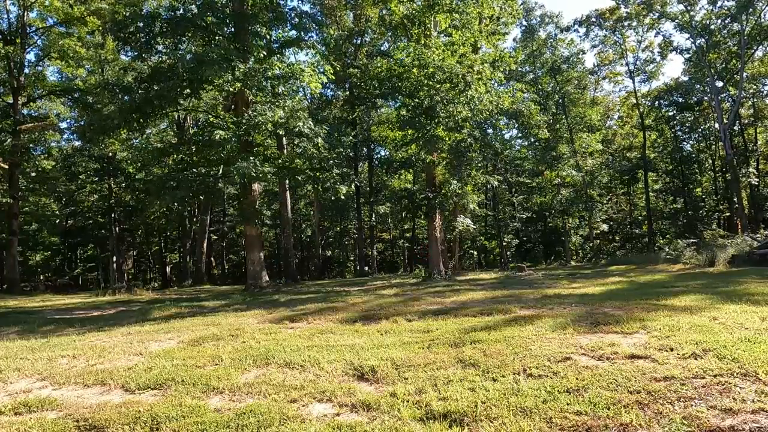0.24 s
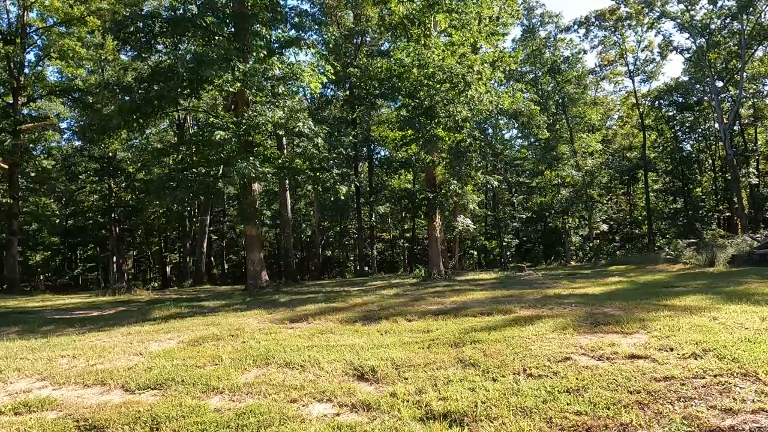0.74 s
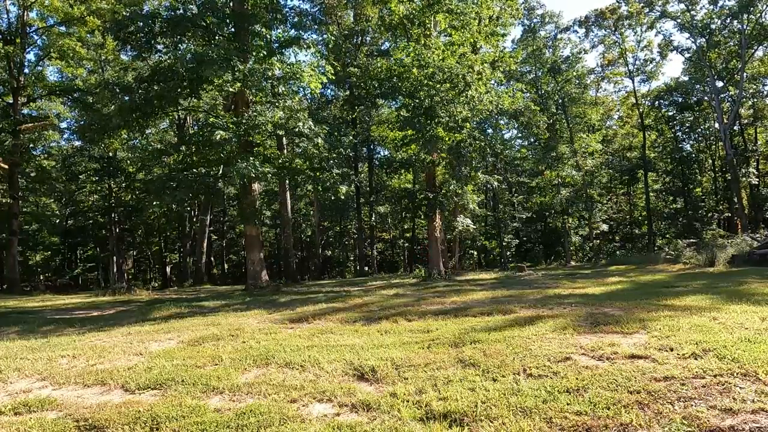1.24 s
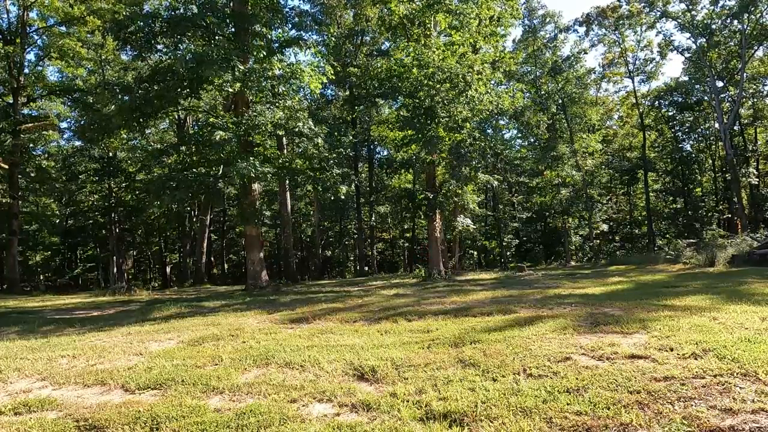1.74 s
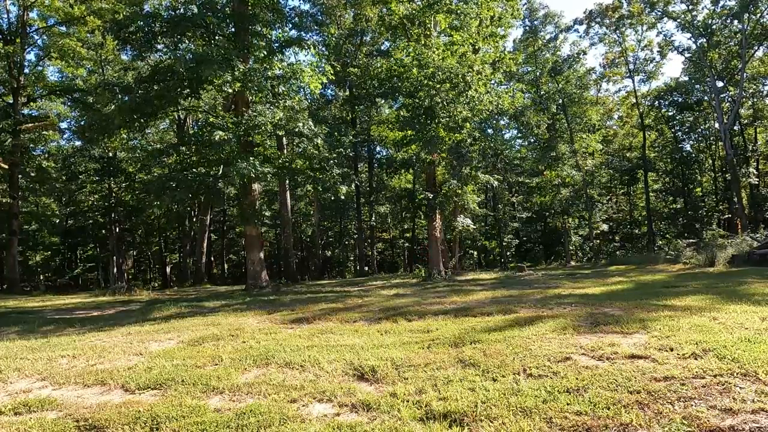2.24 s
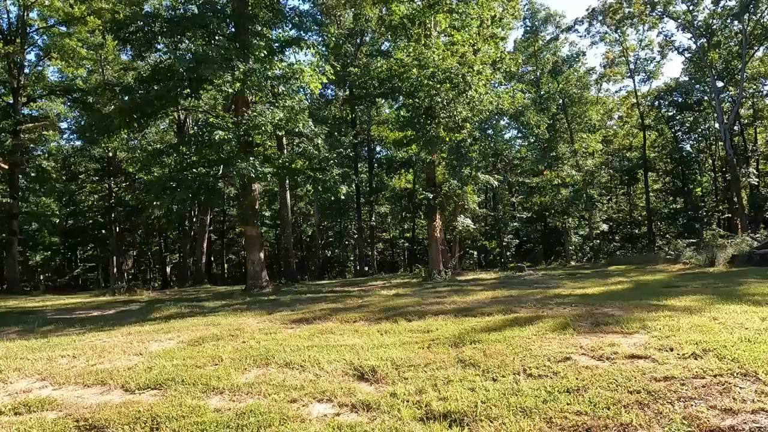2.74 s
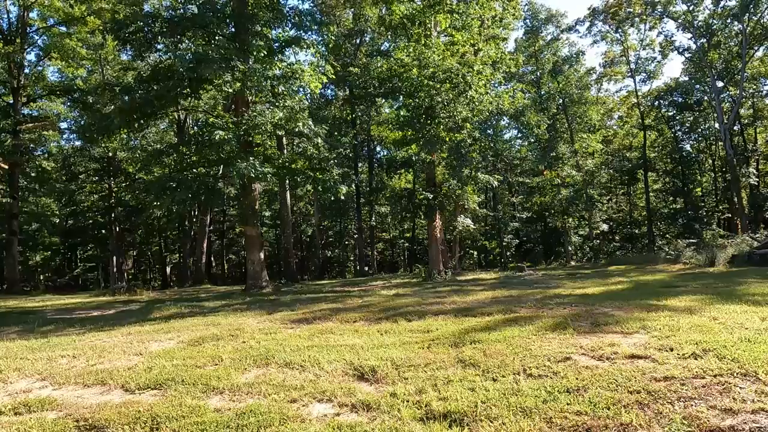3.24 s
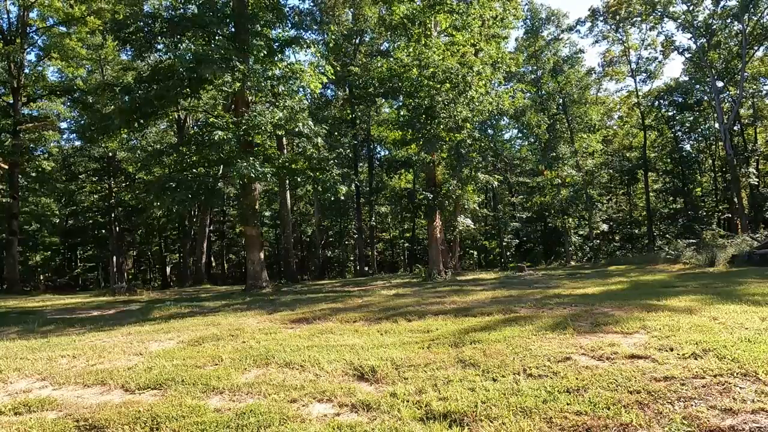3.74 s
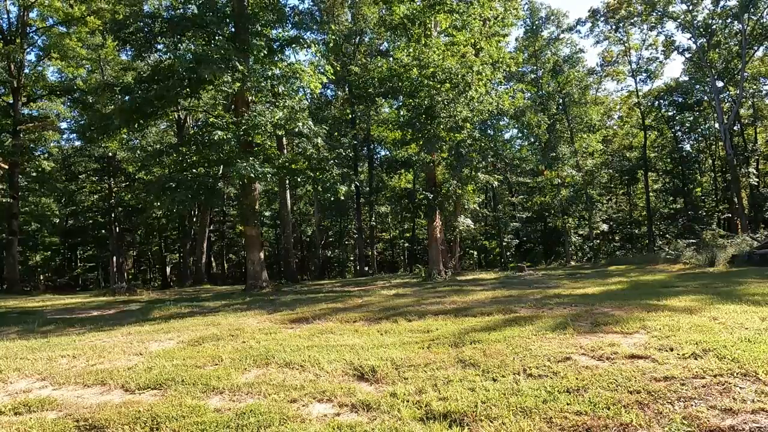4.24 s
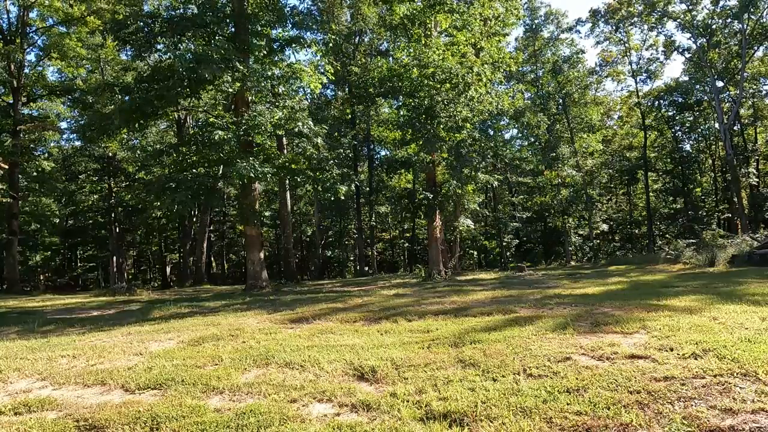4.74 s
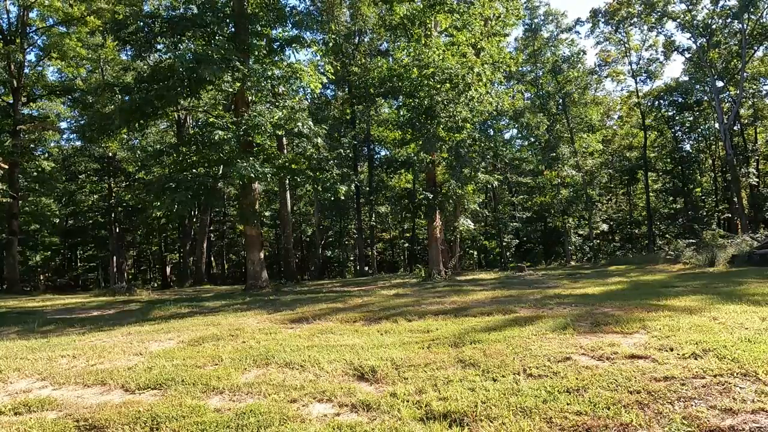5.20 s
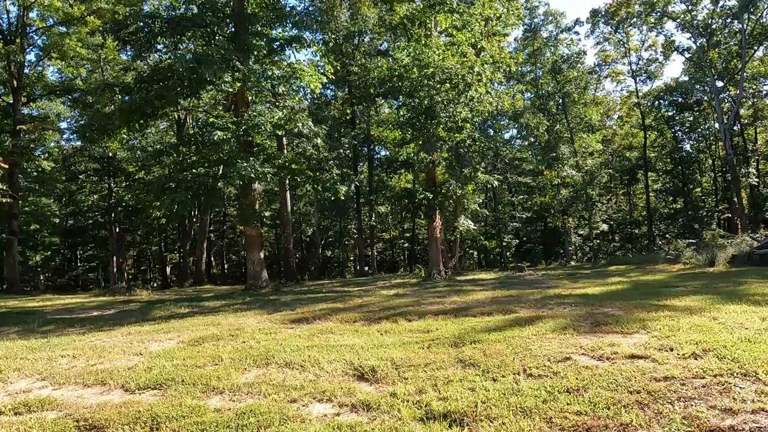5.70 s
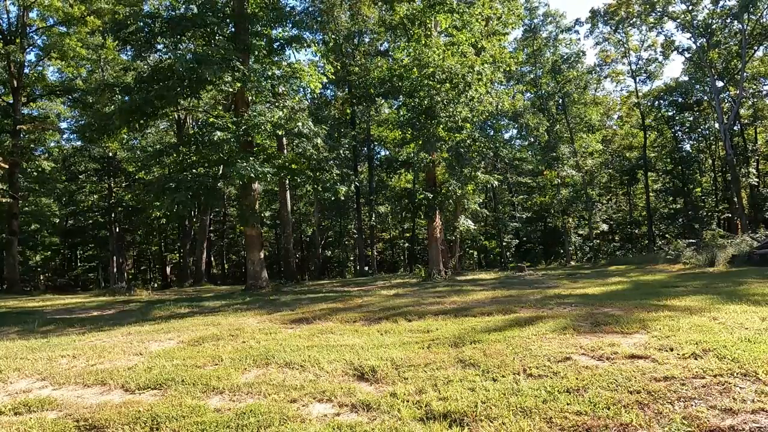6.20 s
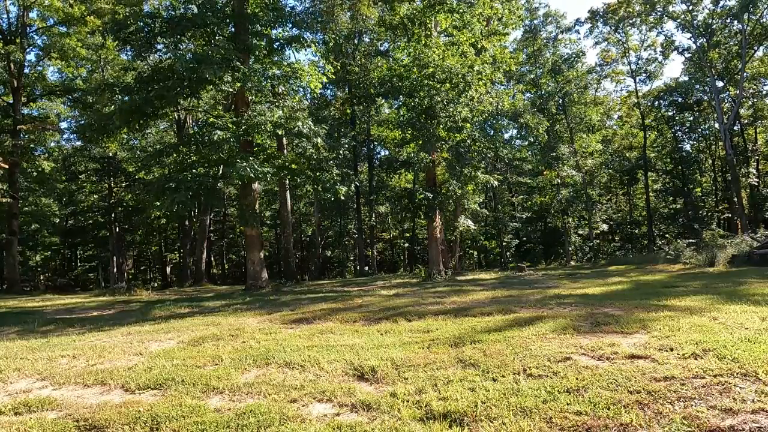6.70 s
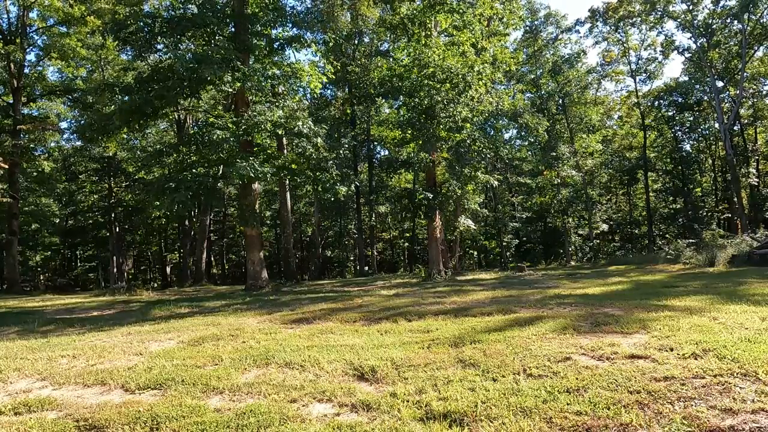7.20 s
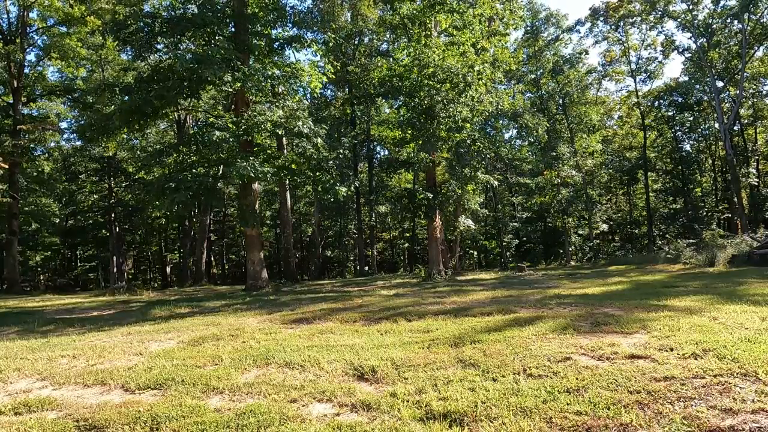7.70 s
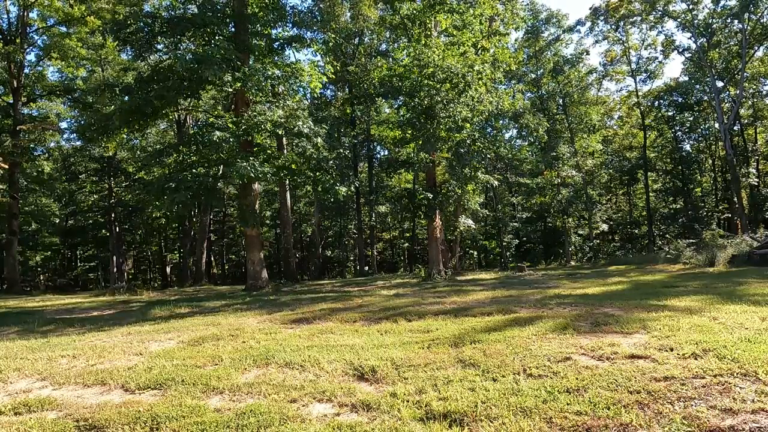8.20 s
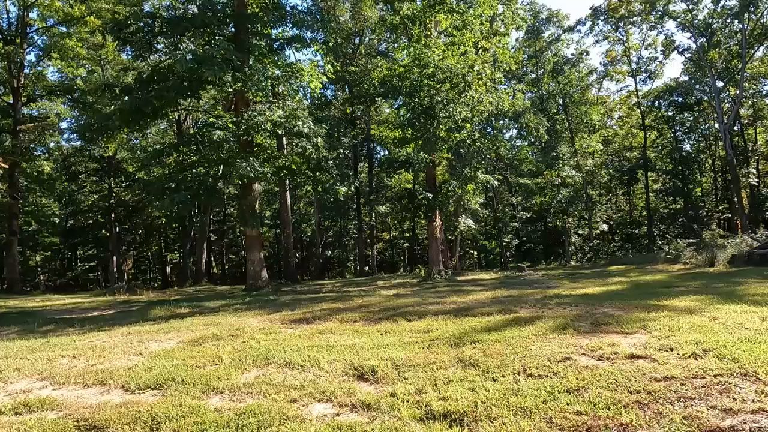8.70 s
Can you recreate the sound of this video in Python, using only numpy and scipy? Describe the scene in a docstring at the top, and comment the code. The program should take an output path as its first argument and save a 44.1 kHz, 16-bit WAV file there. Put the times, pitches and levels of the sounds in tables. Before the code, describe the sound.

Quiet grassy clearing by trees: brief wind gusts rumble at the microphone over soft leaves, thin insect pulses and cricket chirps. Then steady hammering on a wedge begins, loud and slightly right of centre. The first blow is looser; later ones thump more solidly and the knock mostly tightens in pitch before dropping on the ninth. Each blow bounces off nearby trunks and a wall, then fades into the woods.

```python
"""At the edge of a wood, across a lawn: gusts rumble at the microphone over a hush of leaves, all shaped noise.
From the start two high insects pulse, a far throbbing trill swells twice, and a cricket whistles until about 3.6 s.
At 2.3 s a sledge begins driving a wedge into a large tree: nine blows, the last at 8.4 s.
Each blow cracks (damped modes), thumps the trunk, rings the steel and rolls off among the trees (scattered
noise), then returns off nearby trunks and a wall behind the microphone. Two tiny noise ticks lie in the grass."""
import sys
import numpy as np
from scipy import signal
from scipy.fft import rfft, irfft, next_fast_len
from scipy.io import wavfile

SR = 44100
rng = np.random.default_rng(int(sys.argv[2]) if len(sys.argv) > 2 else 0)


def output_pcm(signal):
    """Save a mono or channel-first signal as 16-bit PCM at the path in sys.argv[1].

    Samples are clipped to [-1, 1] before scaling.
    """
    pcm = np.clip(np.atleast_2d(signal).T, -1, 1) * 32767
    wavfile.write(sys.argv[1], SR, np.round(pcm).astype(np.int16))


N = 394694  # samples, nearly 9 s

# Levels in the tables are relative: further gains and filters act on them.
# breeze at the microphone: time_s, level_db
BREEZE = [(0.0, -30), (1.2, -47), (1.32, -37.5), (1.68, -27.5), (2.04, -43), (2.16, -36.5), (3.48, -35.5),
          (3.6, -48), (3.96, -43.5), (4.08, -41), (6.24, -40), (6.36, -48), (7.32, -41), (8.16, -52),
          (8.52, -41), (8.64, -50), (8.94, -49)]
# sudden gusts: peak_s, length_s, rumble_db, buffeting_db
GUSTS = [(.115, .1, -28, -37), (3.96, .1, -31, -44), (7.335, .16, -33, -51)]
# colour of the wind at the microphone: frequency_hz, level_db per Hz
WIND_COLOUR = [(9, 0), (15, 1), (29, 1.5), (45, -2.5), (61, -6.5), (93, -10.5), (124, -12), (210, -25),
               (269, -27.5), (350, -29.5), (600, -49), (780, -77), (1320, -120)]
# left-right likeness of the wind: frequency_hz, likeness (0 to 1)
WIND_LIKENESS = [(25, 0.66), (70, 1), (200, 0.93)]
RUMBLE_DB, FLUTTER_DB, FLUTTER_S = 0.5, 2.5, 0.12  # rumble over the breeze; its random unsteadiness
BUFFET_DB, BUFFET_FOLLOWS = -31.5, 0.49  # buffeting grows more slowly than rumble: dB, dB per dB of breeze

# colour of the leaves: frequency_hz, level_db per Hz
LEAVES_COLOUR = [(150, 0.5), (250, -9.5), (350, -11.5), (620, -11.5), (674, -11), (784, -13.5),
                 (1510, -7.5), (1820, -9.5), (2260, -9.5), (4070, -16), (4510, -15), (5070, -14),
                 (7590, -23.5), (8250, -32), (13900, -45)]
# left-right likeness of the leaves: frequency_hz, likeness (0 to 1)
LEAVES_LIKENESS = [(60, 0.91), (130, 1), (280, 0.79), (610, 0.76), (1320, 0.8), (2870, 0.59), (6210, 0.49),
                   (13400, 0.99)]
LEAVES_DB = -53.5

# swells of the far insect trill: peak_s, length_s, level_db
TRILLS = [(.01, 0.36, -61.5), (2.25, 1, -66)]
TRILL_HZ, TRILL_WIDTH_HZ, TRILL_PER_S = 3240, 90, 24
# cricket chirps: start_s, level_db
CRICKET_CHIRPS = [(.14, -61), (.74, -60), (1.429, -59), (2.15, -67), (2.86, -60), (3.559, -61)]
# pulses within a chirp: delay_s, pitch_hz (at the top of its arch), level_db
CRICKET_PULSES = [(0, 4470, 2), (.055, 4570, 3.5), (.11, 4660, 3.5), (.172, 4630, 4.5)]
# steady insects: pitch_hz, chirps_per_s, level_db
INSECTS = [(7850, 6.3, -75), (7550, 6.6, -76)]
# tiny ticks in the grass: start_s, level_db
TICKS = [(.46, -52), (8.799, -56)]

# reflections off nearby trunks and the wall: delay_s, level_db
ECHOES = [(0.0587, -5.5), (0.1113, 2), (0.1184, -16), (0.1265, -12.5)]
# colour of those reflections: frequency_hz, level_db
ECHO_COLOUR = [(60, -19.5), (100, -3), (150, -15.5), (220, -8.5), (600, -11.5), (1200, -4.5), (4000, -9.5),
               (7000, -9), (10000, -18.5), (15000, -26)]
# ring of the closest trunks: frequency_hz, t60_s
CLOSE_TRUNKS = [(500, 0.33), (2000, 0.26), (5000, 0.21), (10000, 0.17)]
# ring of the deep wood: frequency_hz, t60_s
FOREST = [(100, 2.24), (500, 0.64), (1100, 2.63), (2000, 1.58), (3500, 1.38), (6000, 0.63), (12000, 0.72)]
NEAR_DB, FARTHER_DB, FOREST_DB = -2.5, -6, -7.5  # closest trunks, those behind them, the deep wood

# waves in the struck trunk, with a late boom: delay_s, pitch_hz, level_db, t60_s
TRUNK = [(0.0018, 227, -13, 0.017), (0.023, 1000, -24, 0.055), (0.00794, 690, -28, 0.057),
         (0.031, 523, -34.5, 0.061), (.031, 371, -27.5, 0.061), (0.01225, 262, -32, 0.168),
         (0.0262, 92.3, -23, 0.15), (.13, 140, -27.5, 0.22)]
# colour of the trunk's dense knock: frequency_hz, level_db
KNOCK = [(40, -31), (100, 13), (200, 17.5), (330, 13), (450, 11), (700, 11), (1000, 0), (1600, 6),
         (4000, -32)]
THUD_DB, SLACK_DB, SEATING_BLOWS = 0.14, -11, 1.52  # a loose wedge barely moves the trunk, then it seats

# free ring of the steel: pitch_hz, level_db, t60_s
STEEL = [(5080, -39.5, 0.47), (5140, -40, 0.64), (4700, -48, 0.36), (7400, -52, 0.19)]
STEEL_ECHO_DB = -1  # a little less of the ring is reflected

# modes of the struck wedge and the wood gripping it: pitch_hz (before detuning), width_hz, level_db
CRACK = [(1000, 440, 9), (1304, 116, 18), (1459, 59, 23.5), (1838, 170, 18), (2125, 87, 15),
         (2396, 730, 18.5), (2700, 180, 18.5), (3180, 230, 19.5), (3580, 120, 17.5), (4054, 280, 18.5),
         (4170, 350, 14.5), (5330, 1260, 17), (6530, 810, 13.5), (8580, 180, -2.5), (10190, 380, 4.5),
         (12600, 1300, -3)]
CRACK_DB, CRACK_FOLLOWS = -1.94, 0.73  # level, and dB per dB of a blow's strength
CRACK_BRIGHTENS = 1.33  # dB per dB of a blow's edge
CRACK_BODY_DB, CRACK_BODY_HZ, CRACK_BODY_OCTAVES = -2.5, 1180, 1  # thin in the low middle

# colour of what the wedge sends sideways among the trees: frequency_hz, level_db
CLACK = [(100, -42), (450, -1.5), (750, 1), (1000, 7), (1400, 5), (2000, 6), (4000, 3.5), (6000, -3),
         (7200, -9), (8600, -16), (10500, -23), (14000, -44)]
CUT_HZ, CUT_OCTAVES = 1087, 0.33  # the saw cut keeps its pitch
WEDGE_OCTAVES = 0.25  # width of the wedge's own clang
EDGE_BAND_HZ, EDGE_OCTAVES = 8600, 0.5  # a square blow has a sharp edge here

# one row a blow; the gripping wood mostly climbs in pitch as it tightens, and drops when it gives: start_s,
# strength_db, cut_db, grip_hz, grip_width_octaves, grip_db, clang_hz, clang_db, edge_db, steel_ring_db,
# second_crack_db, echo_db
BLOWS = [(2.2885, -1.5, 7, 1410, 0.23, 5, 2440, 9, -5, -19, -10.5, -4),
         (3.0566, 1, -5, 1363, .2, 12.5, 3070, 6.5, 0, -20, -10, -2),
         (3.831, 0.25, -1, 1530, 0.15, 7.5, 3100, 6, 2.5, -3.5, -16, -.5),
         (4.601, 1.5, 2.5, 1680, 0.19, 8, 3170, 6.5, 2.5, -3, -8.5, -2.5),
         (5.3614, 0, 9, 2100, .3, 15.5, 3140, 10, -0.5, -9, -14.5, -3),
         (6.0943, 1, 9, 2100, 0.23, 12.5, 2900, 7.5, 2.5, -8, -8, -3),
         (6.849, 0.5, 10.5, 1880, 0.2, 7.5, 3100, 4.5, 0, 2, -14, -3),
         (7.6113, -1, 13, 1950, 0.17, 5.5, 3200, 7, 5.5, -11, -28, -1.5),
         (8.396, 2, 6, 930, 0.075, 6, 3500, 0.5, 3.5, -27, -27, 0)]

TOP_HZ = 14300


def amp(db):
    """Amplitude factor of a level in dB."""
    return 10 ** (np.asarray(db) / 20)


def evened(x):
    """Scale to an rms of 1."""
    return x / np.sqrt(np.mean(x ** 2) + 1e-20)


def read(points, hz):
    """A spectrum joined by straight lines over log frequency."""
    f, value = np.transpose(points)
    return np.interp(np.log(hz + 1), np.log(f + 1), value)


def add(mix, start_s, sound):
    """Lay a sound into the mix, cut off at the mix's end."""
    part = mix[..., round(start_s * SR):][..., :sound.shape[-1]]
    part += sound[..., :part.shape[-1]]


def convolve(x, response):
    """Pass x through a response, keeping the length of x."""
    return signal.fftconvolve(np.atleast_2d(x), np.atleast_2d(response), axes=1)[:, :x.shape[-1]]


def bell(hz, centre_hz, octaves):
    """A broad-topped peak of height 1 over log frequency."""
    return np.exp(-abs(np.log2((hz + 1) / centre_hz) / octaves) ** 2.6)


def hump(t, peak_s, length_s):
    """A smooth swell from 0 to 1 and back; about a fifth high half a length from its peak."""
    return np.exp(-np.pi * ((t - peak_s) / length_s * np.sqrt(2)) ** 2)


def colour(gain_db, size=4096):
    """Causal (minimum-phase) impulse response whose gain follows the function gain_db(hz)."""
    log_gain = np.log(amp(gain_db(abs(np.fft.fftfreq(size, 1 / SR)))))
    return np.fft.ifft(np.exp(np.conj(signal.hilbert(log_gain)))).real[:size // 2]


def pair(a, b, likeness):
    """Two channels with the given likeness, from two unrelated signals."""
    likeness = np.clip(likeness, 0, 1)
    return np.sqrt((1 + likeness) / 2) * a + np.sqrt((1 - likeness) / 2) * np.array([b, -b])


def noise(points, likeness, tilt=lambda hz: 1):
    """Stereo noise of rms 1 with the given spectrum, left-right likeness and extra gain tilt(hz)."""
    size = next_fast_len(N, True)
    hz = np.fft.rfftfreq(size, 1 / SR)
    spectrum = pair(*rfft(rng.standard_normal((2, size))), read(likeness, hz))
    return evened(irfft(spectrum * amp(read(points, hz)) * tilt(hz), size)[:, :N])


def scatter(start_s, rise_s, t60, likeness, grain_db=0):
    """Many small random reflections of energy 1 a channel on average; t60 is in s or a table over frequency."""
    t = np.arange(2 * SR) / SR
    grain = np.repeat(rng.standard_normal(len(t) // 50), 50)  # uneven in clumps of 50 samples
    taps = rng.standard_normal((2, len(t))) * amp(grain_db * grain)
    hz, when, z = signal.stft(pair(*taps, likeness), SR, nperseg=256)
    life = read(t60, hz)[:, None] if np.ndim(t60) else t60
    tail = signal.istft(z * amp(-60 * when / life), SR, nperseg=256)[1][:, :len(t)]
    tail = tail * (1 - np.exp(-t / rise_s))
    tail = np.pad(tail, ((0, 0), (round(start_s * SR), 0)))[:, :len(t)]
    return tail / np.linalg.norm(tail) * np.sqrt(2)


def ring(modes, t):
    """Free vibration: dying sines of alternating sign."""
    out = 0
    for k, (hz, db, t60) in enumerate(modes):
        decay = np.exp(-np.log(1000) * t / t60)
        out = out + (-1) ** k * amp(db) * decay * np.sin(2 * np.pi * hz * t)
    return out


def leaves():
    """A far, even hush: steady coloured noise."""
    return amp(LEAVES_DB) * noise(LEAVES_COLOUR, LEAVES_LIKENESS)


def wind(split_hz=65):
    """Eddies at the microphone ports, stronger on the right: deep rumble with buffeting above it."""
    t = np.arange(N) / SR
    knots = np.arange(0, t[-1] + FLUTTER_S, FLUTTER_S)
    flutter = np.interp(t, knots, rng.standard_normal(len(knots)))
    breeze_db = np.interp(t, *np.transpose(BREEZE)) + FLUTTER_DB * flutter
    rumble = amp(RUMBLE_DB + breeze_db)
    buffet = amp(BUFFET_DB + BUFFET_FOLLOWS * breeze_db)
    for peak_s, length_s, rumble_db, buffet_db in GUSTS:
        gust = hump(t, peak_s, length_s)
        rumble = rumble + amp(rumble_db) * gust
        buffet = buffet + amp(buffet_db) * gust
    low = noise(WIND_COLOUR, WIND_LIKENESS, lambda hz: 1 / np.hypot(1, (hz / split_hz) ** 4))
    high = noise(WIND_COLOUR, WIND_LIKENESS, lambda hz: 1 / np.hypot(1, (split_hz / (hz + 1)) ** 4))
    return (rumble * low + buffet * high) * amp([[-1.7], [1.3]])


def trill(depth=0.5):
    """A far insect's buzz: a narrow noise band, throbbing in level, that swells and fades."""
    t = np.arange(N) / SR
    buzz = noise(LEAVES_COLOUR, LEAVES_LIKENESS, lambda hz: 1 / (1 + ((hz - TRILL_HZ) / TRILL_WIDTH_HZ) ** 2))
    throb = 1 + depth * np.sin(2 * np.pi * TRILL_PER_S * t)
    swells = sum(amp(db) * hump(t, peak_s, length_s) for peak_s, length_s, db in TRILLS)
    return buzz * throb * swells


def chirp(hz, length_s, arch):
    """A short whistle that rises and falls in both level and pitch."""
    swell = np.sin(np.linspace(0, np.pi, round(length_s * SR)))
    return swell * np.sin(2 * np.pi * np.cumsum(hz * (1 + arch * (swell - 1))) / SR)


def cricket(calls):
    """Chirps of four whistled pulses each."""
    for start_s, db in CRICKET_CHIRPS:
        for delay_s, hz, pulse_db in CRICKET_PULSES:
            add(calls, start_s + delay_s, amp(db + pulse_db) * chirp(hz, 0.031, 0.042))


def insects(calls):
    """Higher whistles at steady rates, slightly uneven in time and level."""
    for hz, rate, db in INSECTS:
        for start_s in np.arange(0, N / SR, 1 / rate):
            level = amp(db + rng.normal(0, 1.8))
            add(calls, start_s + rng.uniform(0, 0.0054), level * chirp(hz, 0.046, 0.022))


def grass_ticks():
    """Tiny ticks: noise dying away within a few milliseconds."""
    ticks, n = np.zeros(N), np.arange(200)
    for start_s, db in TICKS:
        add(ticks, start_s, amp(db) * rng.standard_normal(200) * np.exp(-n / 35))
    return ticks


def wildlife():
    """Cricket and insects, blurred by distance with scattered sound, and the ticks left dry."""
    calls = np.zeros(N)
    cricket(calls)
    insects(calls)
    blur = amp(-2.5) * convolve(calls, scatter(0.01, 0.01, 0.8, 0.45))
    return calls + grass_ticks() + blur


def echoes(x):
    """Nearby trunks and the wall behind the microphone repeat a blow, recoloured and slightly smeared."""
    back, out = convolve(x, colour(lambda hz: read(ECHO_COLOUR, hz))), np.zeros(x.shape)
    back = back + amp(-6) * convolve(back, scatter(0.001008, 0.00077, 0.02, 1.0))
    for delay_s, db in ECHOES:
        add(out, delay_s, amp(db) * back)
    return out


def near_trees():
    """The closest trunks and those behind them scatter sound back in two clusters."""
    closest = scatter(0.0027, 0.00022, CLOSE_TRUNKS, 0.84, grain_db=3)
    behind = scatter(0.06, 0.0082, 0.39, 0.89, grain_db=2.0)
    return amp(NEAR_DB) * closest + amp(FARTHER_DB) * behind


def deep_wood():
    """The wood's long tail, lasting differently at each frequency."""
    return amp(FOREST_DB) * scatter(0.03, 0.0041, FOREST, 0.7, grain_db=2.5)


def thud(t, swell_s=0.0035):
    """The trunk's answer: delayed, decaying modes in a dense dull knock."""
    knock = scatter(0.001775, 0.009, 0.16, 1.0) + amp(-8.0) * scatter(0.05, 0.0046, FOREST, 0.97)
    out = convolve(knock, colour(lambda hz: read(KNOCK, hz)))
    for delay_s, *mode in TRUNK:
        add(out, delay_s, ring([mode], t) * (1 - np.exp(-t / swell_s)))
    return out


def crack(t, phases, tilt_db, detune=0.036, rise_s=0.00058):
    """Steel meets wedge: heavily damped, randomly detuned modes, weighted by the function tilt_db(hz)."""
    hz, width, db = np.transpose(CRACK)[:, :, None]
    size = amp(db + tilt_db(hz)) * 2 * np.pi * width / SR
    hz = hz * (1 + detune * rng.standard_normal(hz.shape))
    modes = size * np.exp(-np.pi * width * t) * np.sin(2 * np.pi * (hz * t + phases))
    return modes.sum(0) * (1 - np.exp(-t / rise_s))


def hammering(direct_share=0.5, bounce_s=0.0046, crack_likeness=0.8):
    """Each blow: a crack, the trunk's thud, the steel's ring, a clack scattered by the wood, and echoes."""
    t, out = np.arange(2 * SR) / SR, np.zeros((2, N))
    crack_t = t[:SR // 8]
    # these answer every blow alike
    phases = rng.random((2, len(CRACK), 1))
    trunk, steel, near = thud(t), ring(STEEL, t), near_trees()
    for k, (start_s, strength_db, cut_db, grip_hz, grip_octaves, grip_db, clang_hz, clang_db,
            edge_db, ring_db, bounce_db, echo_db) in enumerate(BLOWS):
        def seat(hz):
            """Resonances of the cut, the gripping wood and the wedge."""
            cut = cut_db * bell(hz, CUT_HZ, CUT_OCTAVES)
            grip = grip_db * bell(hz, grip_hz, grip_octaves)
            return cut + grip + clang_db * bell(hz, clang_hz, WEDGE_OCTAVES)

        def edge(hz):
            """The treble of a square blow."""
            return edge_db * bell(hz, EDGE_BAND_HZ, EDGE_OCTAVES)

        def tilt(hz):
            """The crack's balance of edge and body."""
            body = CRACK_BODY_DB * bell(hz, CRACK_BODY_HZ, CRACK_BODY_OCTAVES)
            return CRACK_BRIGHTENS * edge(hz) + body

        clack = convolve(near + deep_wood(), colour(lambda hz: read(CLACK, hz) + seat(hz) + edge(hz)))

        contact = pair(*(crack(crack_t, p, tilt) for p in phases), crack_likeness)
        second_crack = amp(bounce_db) * crack(crack_t, phases[0], tilt)  # the crack sounds again once, a few milliseconds later
        add(contact, bounce_s * rng.uniform(0.8, 1.1), second_crack)
        direct = convolve(contact, colour(lambda hz: direct_share * seat(hz)))

        thud_db = THUD_DB + SLACK_DB * np.exp(-k / SEATING_BLOWS)
        blow = amp(strength_db) * clack + amp(thud_db) * trunk
        add(blow, 0, amp(CRACK_DB + CRACK_FOLLOWS * strength_db) * direct)
        ping = amp(ring_db) * steel
        reflected = amp(echo_db) * echoes(blow + amp(STEEL_ECHO_DB) * ping)
        add(out, start_s, blow + ping + reflected)
    return out


def scene():
    """The wood's edge, with the hammering slightly right of centre."""
    background = leaves() + wind() + trill() + wildlife()
    return background + hammering() * amp([[-0.55], [0.55]])


def record(dry):
    """A steep low-pass: nothing sounds above about 14 kHz."""
    low_pass = signal.firwin(255, TOP_HZ, window=("kaiser", 8), fs=SR)
    return signal.oaconvolve(dry, low_pass[None], "same")


dry = scene()
out = record(dry)
output_pcm(out)
```